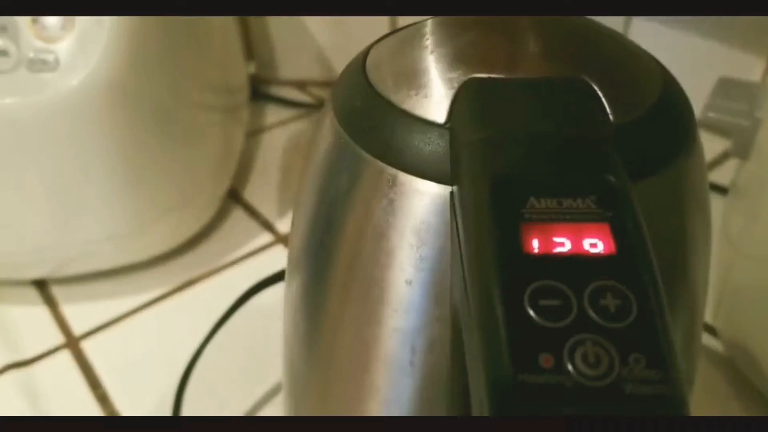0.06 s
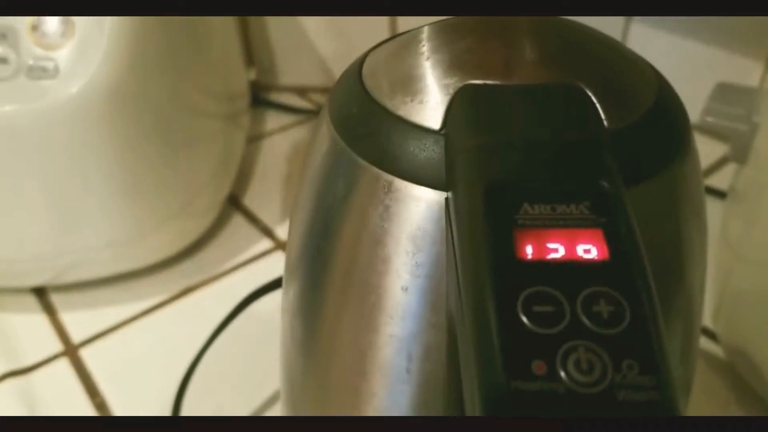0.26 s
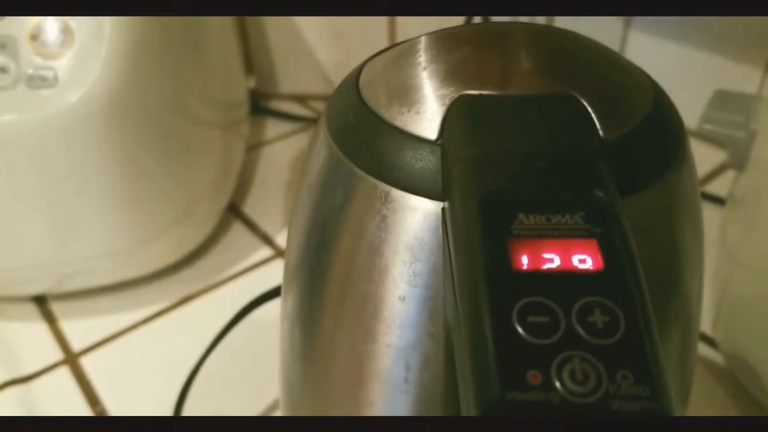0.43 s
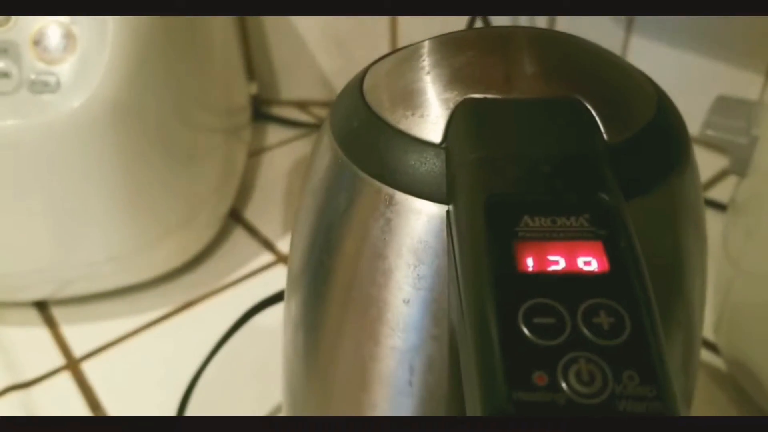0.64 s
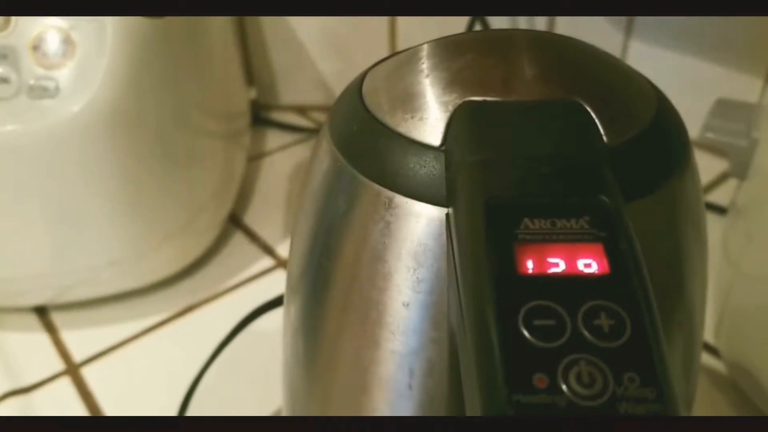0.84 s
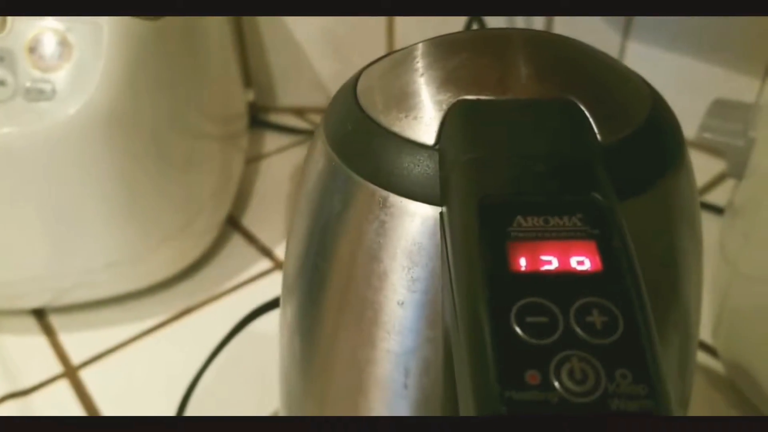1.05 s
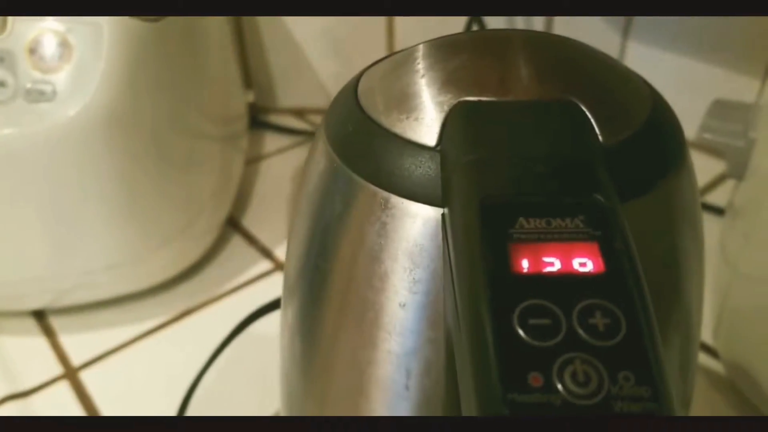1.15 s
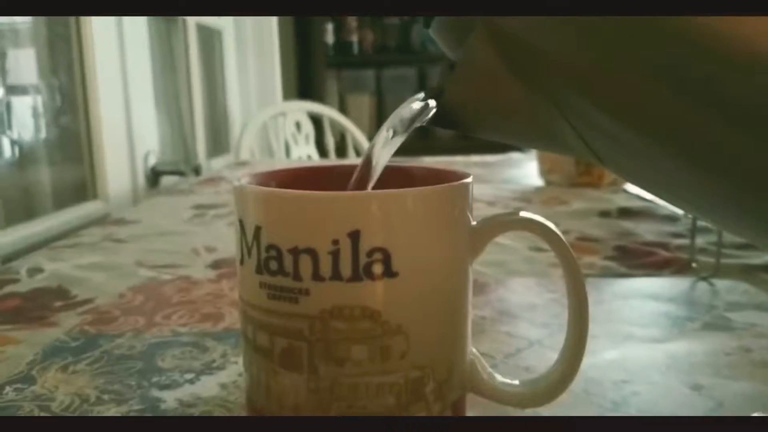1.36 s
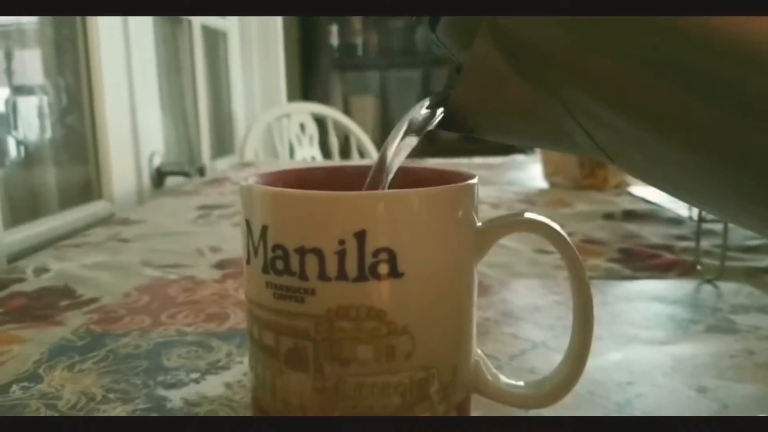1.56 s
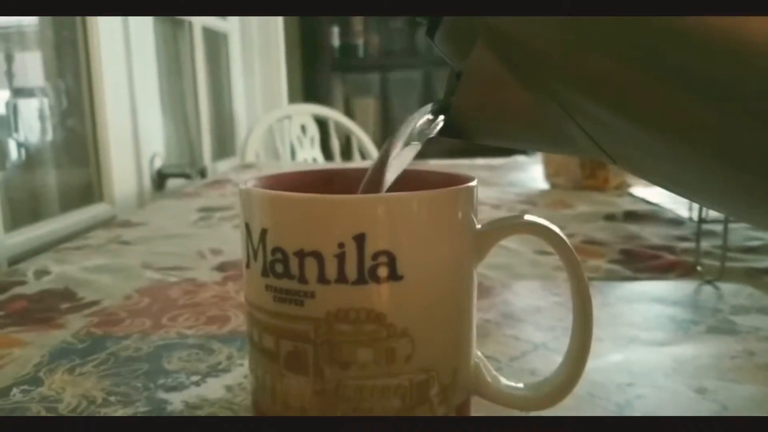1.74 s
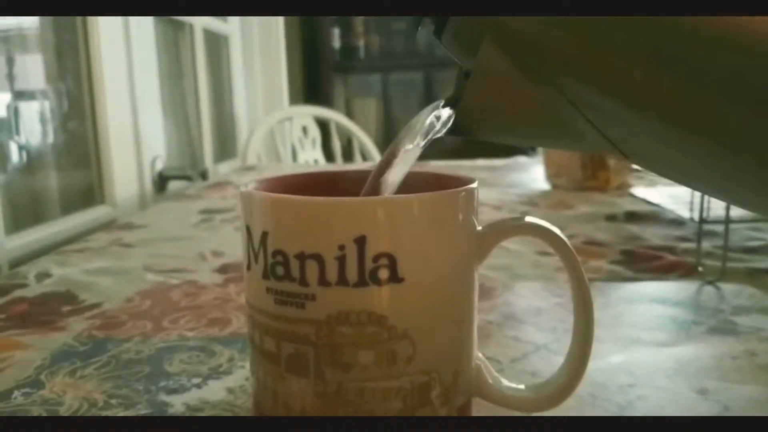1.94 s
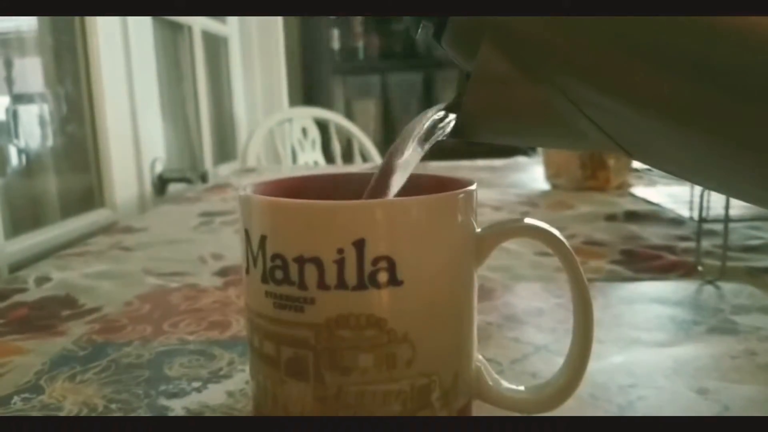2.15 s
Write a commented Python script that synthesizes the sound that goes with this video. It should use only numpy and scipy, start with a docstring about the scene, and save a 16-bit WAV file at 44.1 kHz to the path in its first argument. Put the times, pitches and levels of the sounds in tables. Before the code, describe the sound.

Water simmers close by in a steel electric kettle, making an even, rushing hiss over a faint kitchen hum. It stops suddenly, and a soft trickle of water falls into a mug, spattering and bubbling lightly.

```python
"""A simmering steel kettle fades in: countless steam bubbles collapse and make its body ring.
The sound then cuts to a thin stream of water poured into a mug. Droplets snap, tiny bubbles
fizz, and trapped air plops and gurgles. A low appliance hum fills the kitchen throughout."""
import sys
import numpy as np
from scipy import signal
from scipy.fft import rfft, irfft
from scipy.io import wavfile

SR = 44100
rng = np.random.default_rng(int(sys.argv[2]) if len(sys.argv) > 2 else 0)


def wav_record(signal):
    """Record a signal, one row per channel, as 16-bit PCM in the file named by sys.argv[1]."""
    frames = np.transpose(np.atleast_2d(signal))
    bounded = np.clip(frames, -1, 1)
    # unit amplitude maps onto the largest positive 16-bit level
    quanta = np.round(bounded * 32767).astype(np.int16)
    wavfile.write(sys.argv[1], SR, quanta)


N = 97020
T = np.arange(N) / SR
FADE_IN_S, FULL_S, CUT_S = 0.16, 0.47, 1.2515

# Overall tone of the kettle body: pitch_hz, level_db
KETTLE_TONE = [(30, -40), (60, -33), (110, -41), (250, -10), (360, -12.5), (440, -20), (560, -9.5),
               (900, -12), (1100, -9), (1320, -21), (1520, -14), (2000, -17.5), (2700, -11.5),
               (3400, -16.5), (4400, -18), (5350, -24.5), (5950, -32), (6700, -21.5), (8000, -28.5),
               (10000, -31), (14500, -34), (15800, -51)]
# Pitches at which the steel shell rings: pitch_hz, width_hz, boost_db
KETTLE_RINGS = [(617, 23.5, 9.5), (787, 78, 12.5), (1054, 46, 3), (1497, 11, 4), (1760, 116, 12),
                (2120, 54, 2), (2357, 12, 6.5), (2624, 14, 6.5), (2719, 13, 3), (2947, 132, 8),
                (4110, 120, 6), (4470, 66, 7), (5203, 70, 11), (5555, 22, 13.5), (7020, 170, 5),
                (8440, 110, 6.5), (9800, 58, 6), (11680, 280, 8)]
# Loudness of the simmer: time_s, level_db
SIMMER_LEVELS = [(.15, -32.5), (.45, -33.5), (.62, -33), (.88, -33), (1.0, -32.5), (1.1, -33),
                 (1.25, -33.5)]
# Larger bubbles that stir the kettle water: middle_s, length_s, pitch_hz, level_db
KETTLE_BUBBLES = [(.322, .05, 770, -38), (.476, .05, 270, -50), (.476, 0.0584, 161, -51),
                  (0.931, 0.035, 323, -47), (1.004, 0.048, 606, -30), (1.016, .04, 255, -42),
                  (1.234, 0.017, 750, -34)]
# Tones of the appliance hum: pitch_hz, wander_hz, by_kettle_db, by_mug_db
HUM_TONES = [(97, 6.7, -76.5, -82), (117, 3.84, -64.5, -69.5), (160.5, 2.94, -58, -63),
             (290, 8.9, -79, -80), (323, 11.9, -75, -65.5), (356.4, 17.7, -64, -62),
             (380.7, 7.9, -75, -64.5), (482.5, 17.6, -80, -73), (546.4, 4, -70, -74), (977, 3.9, -71, -76)]
# Overall tone of the room air: pitch_hz, level_db
AIR_TONE = [(25, -46), (60, -2.5), (110, 6.5), (250, -2), (500, -3.5), (700, -3.5), (1050, -8),
            (1400, -11.5), (2200, -25.5), (3200, -32.5), (4700, -28.5), (7000, -34.5), (14000, -32.5),
            (16000, -39)]
# Droplets that snap in the mug: start_s, pitch_hz, width_octaves, level_db
DROPLETS = [(1.3846, 4750, 0.17, -53.5), (1.470, 12700, 0.26, -59), (1.519, 13330, 0.35, -51),
            (1.578, 5300, .5, -57), (1.604, 4700, 0.33, -51), (1.6107, 5900, 0.18, -45),
            (1.6142, 5100, .4, -50), (1.618, 12400, 0.17, -53), (1.621, 5300, .4, -54),
            (1.657, 12600, .25, -50), (1.657, 5550, 0.43, -51), (1.659, 2650, 0.46, -51.5),
            (1.675, 5700, 0.18, -44.5), (1.683, 5400, 0.56, -49), (1.744, 7640, 0.35, -46),
            (1.787, 5900, 0.74, -44.5), (1.799, 5970, 0.66, -51), (1.806, 5100, 0.36, -49),
            (1.8215, 8000, 0.62, -57), (1.848, 4670, 0.43, -47.5), (1.86, 7000, 1, -48.5),
            (1.8724, 5270, .3, -43), (1.8934, 5140, .6, -48.5), (1.907, 8160, 1.5, -43),
            (1.908, 3080, 0.41, -51.5), (1.9292, 5030, 0.36, -50), (1.938, 5370, 1.4, -51),
            (1.9947, 4940, .4, -57), (2.0082, 4800, 0.31, -44.5), (2.0171, 4930, 0.35, -46.5),
            (2.0302, 6700, 1.7, -46.5), (2.047, 8000, 1.5, -53), (2.064, 7000, 1.7, -56),
            (2.1052, 11000, 0.55, -54), (2.1267, 5700, 0.19, -49), (2.147, 6230, .9, -54),
            (2.168, 8050, 1.5, -47), (2.184, 5600, 1.5, -45)]
# First splashes of the stream: start_s, pitch_hz, width_octaves, level_db
FIRST_SPLASHES = [(1.484, 5900, .07, -52), (1.483, 7400, 0.42, -51), (1.483, 12300, 0.39, -52.5),
                  (1.540, 11900, 0.45, -47.5)]
# Loudness of the fine spray: time_s, level_db
SPRAY_LEVELS = [(1.44, -94), (1.49, -84), (1.57, -79), (1.63, -70), (1.70, -64.5), (1.78, -62),
                (1.84, -62.5), (1.92, -62.5), (1.98, -78), (2.04, -63.5), (2.09, -74), (2.15, -60),
                (2.2, -64)]
# Overall tone of the spray: pitch_hz, level_db
SPRAY_TONE = [(400, -30), (1100, 16), (1400, -9), (1750, 11), (2600, -5.5), (3600, -4.5), (4500, 7),
              (6200, 4.5), (7000, 0), (10000, 5), (13000, 4), (15500, -8)]
# Pitches at which the air in the mug rings: pitch_hz, width_hz, boost_db
MUG_RINGS = [(1050, 120, 7), (1750, 140, 5.5), (3440, 200, 8.5), (4570, 280, 6.5), (5960, 210, 11)]
# Trapped air bubbles: start_s, pitch_hz, peak_db, decay_s
AIR_BUBBLES = [(1.6565, 1630, -44.5, 0.0025), (1.738, 343, -48.5, 0.0092), (1.761, 1040, -54, .009),
               (1.770, 870, -58, .008), (1.7822, 1710, -37.5, 0.0015), (1.8211, 1780, -40.5, 0.0029),
               (1.9074, 1770, -55.5, 0.007), (2.030, 1830, -51, 0.0045), (2.0396, 1730, -43.5, 0.0036),
               (2.0478, 1770, -37.5, 0.0019), (2.0652, 1780, -40, 0.002), (2.092, 1870, -47, .004),
               (2.0965, 1930, -43.5, .005), (2.111, 1960, -42.5, 0.0041), (2.1225, 1800, -44.5, 0.0037),
               (2.134, 1780, -45, 0.0019), (2.1488, 1926, -37.5, 0.0029), (2.160, 1965, -48, .005),
               (2.1688, 1720, -31, 0.0013), (2.177, 1880, -61, .004), (2.1845, 1850, -43, 0.0017)]
# Longer ringing bubbles in the mug: middle_s, length_s, pitch_hz, level_db
MUG_BUBBLES = [(1.747, 0.04, 349, -53), (1.752, .035, 4260, -67.5), (1.767, 0.021, 4330, -62),
               (1.769, 0.025, 1038, -53.5), (1.777, 0.022, 820, -58.5)]


def amp(db):
    """Turns decibels into a number to multiply by."""
    return 10 ** (np.asarray(db) / 20)


def unit(x):
    """Scales a sound to an average strength (rms) of 1."""
    return x / np.sqrt(np.mean(x ** 2) + 1e-20)


def add(mix, start_s, sound):
    """Mixes a sound in at the given time."""
    part = mix[round(start_s * SR):][:len(sound)]
    part += sound[:len(part)]


def colour(x, tone, rings=()):
    """Gives a sound an overall tone and ringing pitches, at a strength of 1."""
    f = np.fft.rfftfreq(N, 1 / SR)
    hz, db = np.transpose(tone)
    response = amp(np.interp(np.log(f + 1), np.log(hz), db)) + 0j
    for pitch_hz, width_hz, boost_db in rings:
        response *= 1 + (amp(boost_db) - 1) / (1 + 2j * (f - pitch_hz) / width_hz)
    return unit(irfft(rfft(x) * response, N))


def drift(rate_hz):
    """A smooth random wobble; a higher rate wobbles faster."""
    f = np.fft.rfftfreq(N, 1 / SR)
    return unit(irfft(rfft(rng.standard_normal(N)) / (1 + (f / rate_hz) ** 4), N))


def clicks(per_s, spread_db):
    """Random clicks, mostly small and a few large."""
    size = amp(spread_db * np.minimum(rng.exponential(1, N), 4))
    return unit(size * rng.choice([-1, 1], N) * (rng.random(N) < per_s / SR))


def puff(pitch_hz, octaves, shape, top_hz=14000):
    """A puff of noise around one pitch, whose loudness follows the shape."""
    f = np.fft.rfftfreq(len(shape), 1 / SR)
    band = 1 / (1 + (2 * np.log2((f + 1) / pitch_hz) / octaves) ** 2)
    band /= np.sqrt(1 + (f / top_hz) ** 24)
    noise = irfft(band * np.exp(2j * np.pi * rng.random(len(f))), len(shape))
    return unit(noise * shape) * np.sqrt(np.mean(shape ** 2) / 2)


def echo(x, echo_db, length_s=0.14):
    """Adds the kitchen's short, blurred echo, which falls 60 dB over its length."""
    t = T[:SR // 2]
    tail = rng.standard_normal(len(t)) * amp(-60 * t / length_s) * np.minimum(t / 0.0013, 1)
    return x + amp(echo_db) * signal.fftconvolve(x, tail / np.linalg.norm(tail))[:N]


def kettle():
    """Steam bubbles collapse on the hot base and make the steel body ring."""
    collapses = clicks(per_s=9000, spread_db=2.5)
    sizzle = 0.48 * rng.standard_normal(N)
    level_db = np.interp(T, *np.transpose(SIMMER_LEVELS)) + 0.3 * drift(30)
    return colour(collapses + sizzle, KETTLE_TONE, KETTLE_RINGS) * amp(level_db)


def room_hum(air_db=-62, waver_db=2):
    """An appliance hums over soft room air, wavering in pitch and loudness."""
    out = amp(air_db) * colour(rng.standard_normal(N), AIR_TONE)
    for pitch_hz, wander_hz, by_kettle_db, by_mug_db in HUM_TONES:
        hz = pitch_hz + wander_hz * drift(2 * wander_hz)
        wave = np.sin(2 * np.pi * np.cumsum(hz) / SR)
        level_db = np.where(T < CUT_S, by_kettle_db, by_mug_db) + waver_db * drift(18)
        out += unit(wave) * amp(level_db)
    return out


def gurgles(bubbles):
    """Bubbles ring on a wavering pitch, each swelling and fading."""
    out = np.zeros(N)
    for middle_s, length_s, pitch_hz, level_db in bubbles:
        count = int(length_s * SR)
        hz = pitch_hz + 25 * drift(76)[:count]
        wave = np.sin(2 * np.pi * np.cumsum(hz) / SR)
        add(out, middle_s - length_s / 2, amp(level_db) * unit(wave) * np.hanning(count))
    return out


def spatter(rise_s=0.00077, decay_s=0.001, fizz_db=-17, fizz_decay_s=0.027):
    """Single droplets snap in the mug; the first splashes leave a short fizz."""
    out, t = np.zeros(N), T[:4096]
    snap = np.minimum(t / rise_s, 1) * np.exp(-np.maximum(t - rise_s, 0) / decay_s)
    fizz = amp(fizz_db) * np.exp(-t / fizz_decay_s)
    for rows, shape in (DROPLETS, snap), (FIRST_SPLASHES, snap + fizz):
        for start_s, pitch_hz, octaves, level_db in rows:
            add(out, start_s, amp(level_db) * puff(pitch_hz, octaves, shape))
    return echo(out, echo_db=-6)


def spray(bubbles_per_s=1700, decay_cycles=4.5):
    """Countless tiny bubbles ring for a few cycles where the stream meets the water."""
    t, pitches_hz = T[:600], np.geomspace(1500, 14500, num=30)
    bubbles = np.zeros(N)
    for hz in pitches_hz:
        ring = unit(np.sin(2 * np.pi * hz * t) * np.exp(-t * hz / decay_cycles)) * np.sqrt(hz)
        starts = clicks(bubbles_per_s / len(pitches_hz), spread_db=4)
        bubbles += signal.oaconvolve(starts, ring)[:N]  # one ring for every click
    hiss = 0.73 * rng.standard_normal(N)
    level_db = np.interp(T, *np.transpose(SPRAY_LEVELS))
    return colour(unit(bubbles) + hiss, SPRAY_TONE, MUG_RINGS) * amp(level_db)


def plops(rise_s=0.00095, glide_per_s=9.2):
    """Air bubbles dragged under by the stream ring briefly and rise in pitch."""
    out, t = np.zeros(N), T[:3000]
    for start_s, pitch_hz, peak_db, decay_s in AIR_BUBBLES:
        cycles = np.cumsum(pitch_hz * (1 + glide_per_s * t)) / SR
        shape = np.minimum(t / rise_s, 1) * np.exp(-np.maximum(t - rise_s, 0) / decay_s)
        add(out, start_s, amp(peak_db) * shape * np.sin(2 * np.pi * cycles))
    return echo(out, echo_db=-7.5)


def scene():
    """The kettle until the cut, then the pour, with the hum under both."""
    pour = spray() + spatter() + plops() + echo(gurgles(MUG_BUBBLES), echo_db=-7.5)
    hum = room_hum()
    simmer = kettle() + gurgles(KETTLE_BUBBLES)
    return (hum + np.where(T < CUT_S, simmer, pour))[None]


def record(dry, bass_hz=400, bass_in_s=0.29, top_hz=15850):
    """Fades in from silence, with the bass thin at first, and trims the highest treble."""
    fade = np.clip((T - FADE_IN_S) / (FULL_S - FADE_IN_S), 0, 1) ** 0.75
    bass = signal.sosfiltfilt(signal.butter(2, bass_hz, fs=SR, output="sos"), dry)
    held_back = np.clip((bass_in_s - T) / (bass_in_s - FADE_IN_S), 0, 0.8)
    treble_cut = signal.firwin(511, top_hz, window=("kaiser", 9), fs=SR)
    return signal.oaconvolve((dry - held_back * bass) * fade, treble_cut[None], "same")


dry = scene()
out = record(dry)
wav_record(out)
```